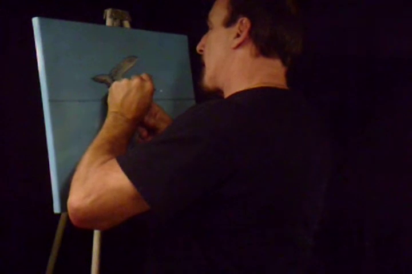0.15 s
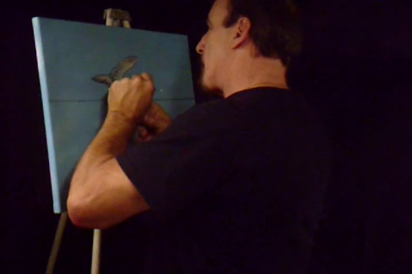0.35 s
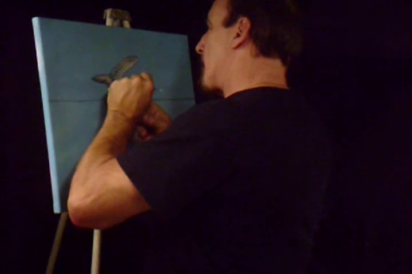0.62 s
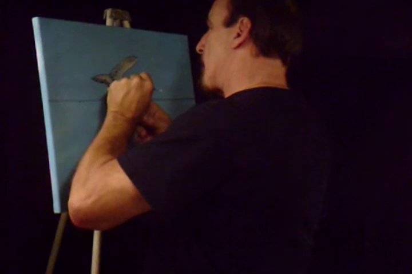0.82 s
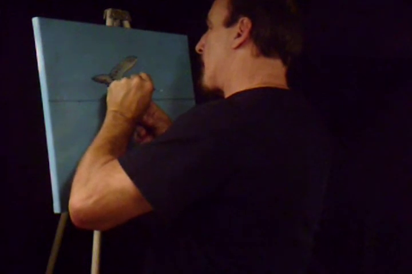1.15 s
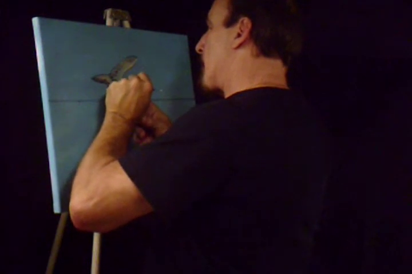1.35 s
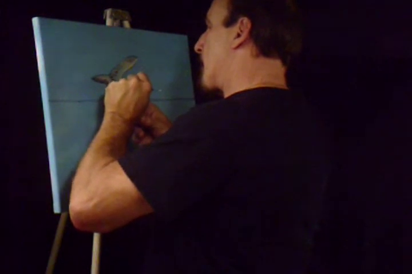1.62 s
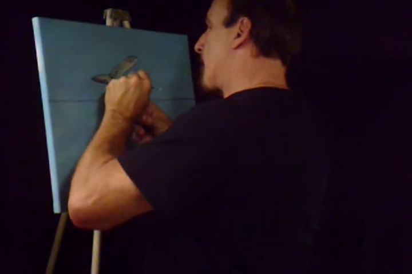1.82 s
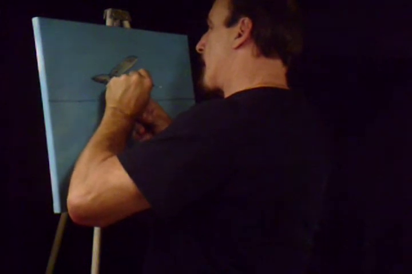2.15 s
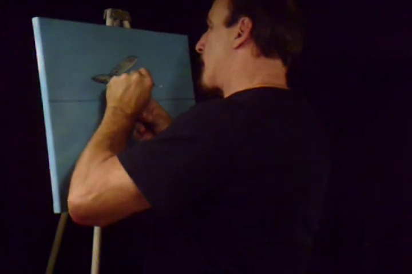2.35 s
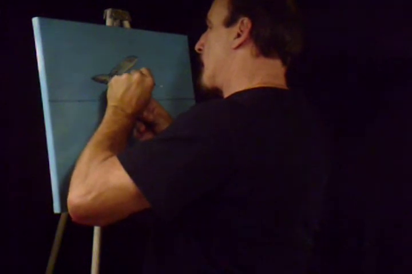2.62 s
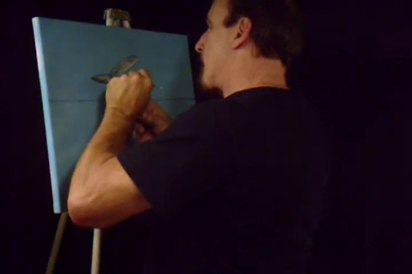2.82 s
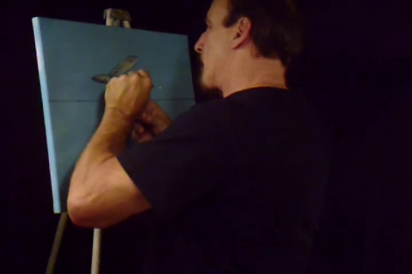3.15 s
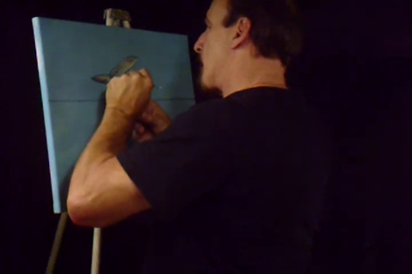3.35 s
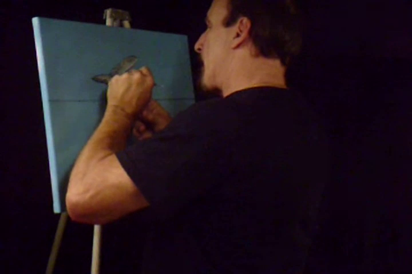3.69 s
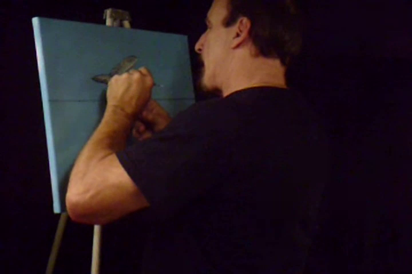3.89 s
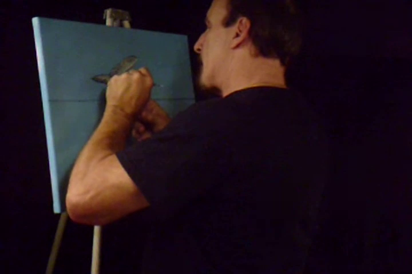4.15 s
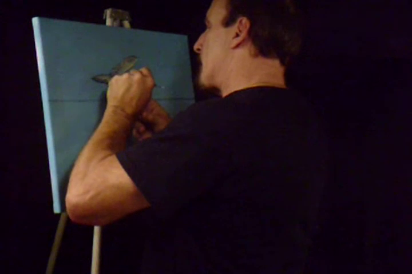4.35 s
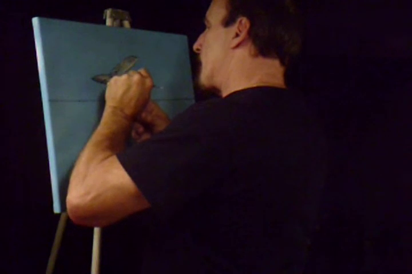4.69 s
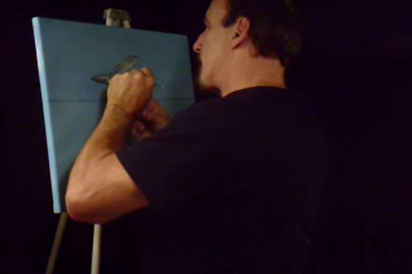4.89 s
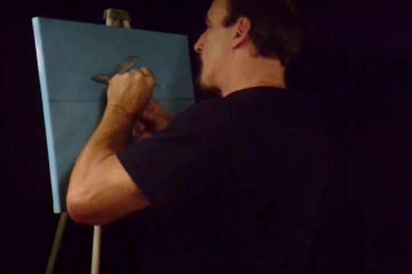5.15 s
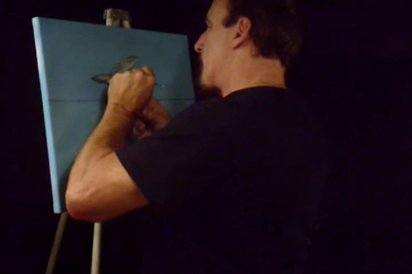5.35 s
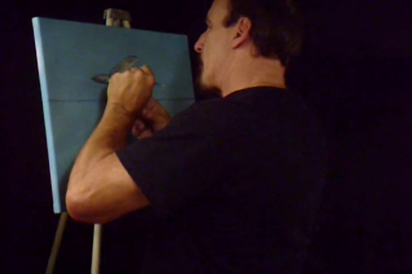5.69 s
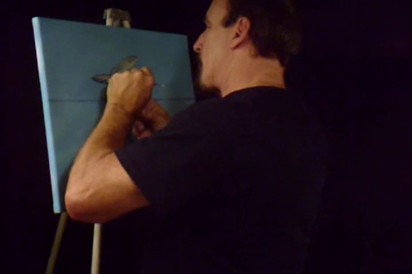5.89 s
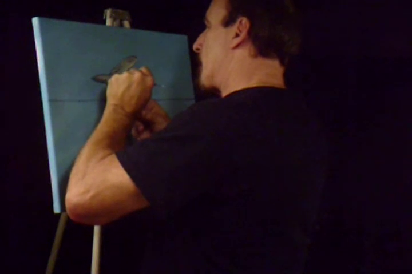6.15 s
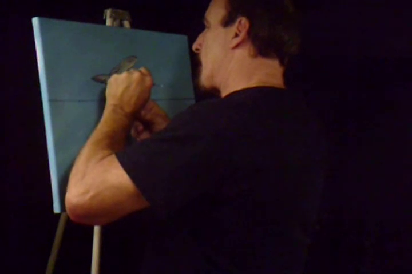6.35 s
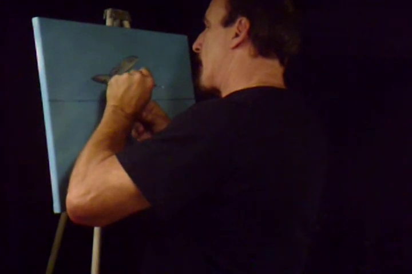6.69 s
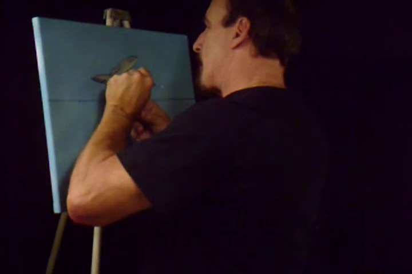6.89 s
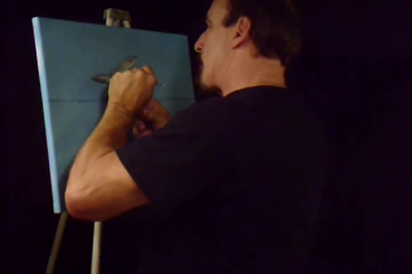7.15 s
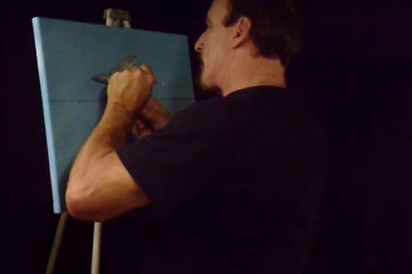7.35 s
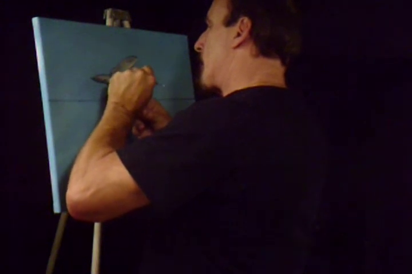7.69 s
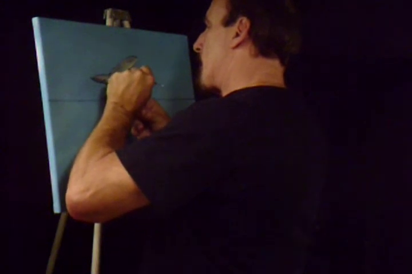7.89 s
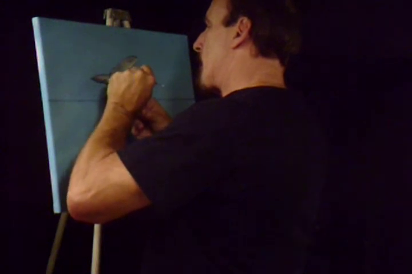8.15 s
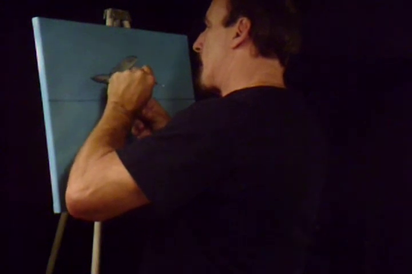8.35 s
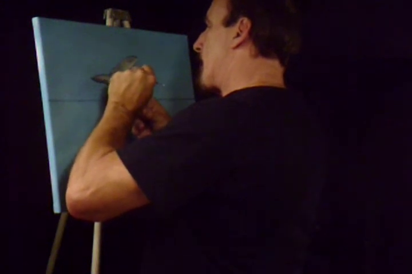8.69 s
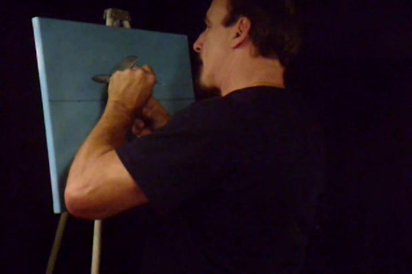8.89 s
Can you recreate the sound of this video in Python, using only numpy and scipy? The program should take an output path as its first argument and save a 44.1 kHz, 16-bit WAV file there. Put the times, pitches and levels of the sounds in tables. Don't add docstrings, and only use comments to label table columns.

```python
import sys
import numpy as np
from scipy import signal
from scipy.fft import rfft, irfft
from scipy.io import wavfile
from scipy.ndimage import uniform_filter1d

SR = 44100
rng = np.random.default_rng(int(sys.argv[2]) if len(sys.argv) > 2 else 0)


def gain_from_db(level_db):
    decades = np.asarray(level_db, float) / 20
    return 10 ** decades


def put_to_file(sound):
    columns = np.atleast_2d(sound).T
    safe = np.clip(columns, -1, 1)
    whole_steps = np.round(safe * 32767)
    wavfile.write(sys.argv[1], SR, whole_steps.astype(np.int16))


N = 397341
T = np.arange(N) / SR

# start_s, first_db, last_db, overshoot_db
GAIN_RAMPS = [(0.0, 1.3, 4.7, 0), (0.4036, -1.9, 4.0, -1.1), (1.3092, -1.9, 1.9, 0.5),
              (2.0174, -4.4, 0.5, -1.1), (2.5166, -2.0, 0.8, -0.9), (3.2248, -3.8, 2.1, -2.9),
              (3.933, -0.1, 1.6, -1.1), (4.3394, -1.6, 5.8, 0.8), (5.036, -1.4, 3.6, 0.7),
              (5.5468, -2.2, 2.6, -3.3), (6.2434, -2.4, 0.9, -3.4), (6.6498, -1.2, 4.9, -0.6),
              (7.3463, -7.4, 2.8, -1.7), (8.4609, -4.0, 1.6, -2)]
# freq_hz, density_db_per_hz
ROOM_SPECTRUM = [(3, -57.5), (18, -43.5), (35, -59), (60, -57), (110, -68.5), (160, -71), (300, -75),
                 (500, -79), (850, -77.5), (1150, -86.5), (1900, -89.5), (2400, -92.5), (5000, -94),
                 (11000, -99)]
# freq_hz, level_db
MOTOR_TONES = [(44.1, -42), (88.2, -48), (132.2, -58), (178.7, -62), (264.1, -64), (287, -64), (300.1, -58),
               (327.7, -69), (368.8, -67), (819.6, -68), (860.7, -69), (983.5, -75), (1080, -76),
               (1147.3, -77), (1450.5, -76), (1475, -69), (1638.9, -72), (1803.1, -77), (1966.9, -79)]
# freq_hz, density_db_per_hz
HISS_SPECTRUM = [(300, -105), (1200, -92.5), (2500, -92.5), (4000, -95.5), (7000, -91.5), (9500, -89.5),
                 (12000, -94.5)]
# freq_hz, level_db
CLOCK_TONES = [(2900.6, -76), (4200, -74), (4341, -79), (4800, -79), (5600, -81), (7400, -77), (7758, -79),
               (8400, -80), (9600.1, -67), (10800, -75), (11250.1, -75)]
# freq_hz, gain_db
CONVERTER_EDGE = [(9300, -0.5), (10300, -1.5), (11000, -9.5), (11800, -17), (12400, -31), (13000, -70)]
# start_s, push_db, rebound_share, hold_ms
FIRST_THUMPS = [(0.1668, -6.5, .21, 15), (0.8699, -4.3, .25, 23), (1.576, -3.9, .21, 17),
                (2.479, -4.8, .28, 21), (3.186, -3.9, .28, 23), (3.8967, -5.4, .14, 41),
                (4.7968, -4.9, .2, 17), (5.507, -5.0, .28, 23), (6.2065, -5.1, .3, 25),
                (7.1178, -5.9, .2, 19), (7.8164, -4.7, .18, 18), (8.7288, -5.7, .27, 13)]
# start_s, push_db, rebound_share, hold_ms
NEXT_THUMPS = [(0.3665, -6.5, .44, 4), (0.5686, -4.8, .2, 22), (1.0785, -4.3, .31, 14),
               (1.2724, -5.6, .21, 22), (1.776, -6.7, .28, 21), (1.9781, -4.3, .22, 16),
               (2.1779, -4.3, .3, 10), (2.689, -6.5, .28, 22), (2.885, -4.2, .29, 6),
               (3.3856, -5.4, .42, 10), (3.5883, -5.6, .3, 9), (4.0924, -6.1, .35, 25),
               (4.2973, -6.0, .24, 24), (4.4936, -6.2, .31, 11), (4.9986, -6.9, .35, 7),
               (5.1995, -5.1, .27, 19), (5.7021, -4.8, .31, 9), (5.9097, -4.7, .21, 24),
               (6.4078, -5.3, .29, 13), (6.6089, -4.7, .2, 29), (6.8102, -6.3, .4, 3),
               (7.3111, -4.0, .38, 4), (7.5205, -5.7, .22, 21), (8.0183, -4.9, .25, 9),
               (8.2183, -6.7, .4, 5), (8.4197, -5.0, .27, 15), (8.925, -7.3, .31, 9)]
# freq_hz, density_db_per_hz
RASP_SPECTRUM = [(150, -78), (350, -74.5), (600, -70), (1200, -82), (3000, -89), (5000, -94),
                 (8000, -89), (11000, -94.5)]
# centre_s, level_db, centre_hz,
# half_length_ms
LISTED_RUSTLES = [(0.624, -56, 5700, 3.5), (1.425, -58, 6100, 4.3), (1.444, -58, 7500, 3),
                  (2.035, -57, 9600, 3.3), (2.226, -56, 3700, 2.4), (2.244, -57, 5570, 2.3),
                  (2.387, -60, 9000, 3.2), (2.398, -57, 9200, 3.2), (2.427, -57, 8600, 2.2),
                  (2.782, -57, 8950, 3.2), (3.237, -57, 8850, 6.8), (3.446, -59, 2500, 6),
                  (3.643, -58, 4800, 3), (3.804, -57, 8800, 3.2), (4.403, -58, 9500, 3.8),
                  (4.449, -56, 5400, 2.2), (5.066, -55, 6600, 2), (5.56, -58, 8000, 6),
                  (5.615, -58, 7000, 6), (5.756, -56, 7600, 2.3), (5.808, -59, 8600, 4.9),
                  (5.96, -59, 4500, 6), (6.265, -55, 5000, 5.9), (6.465, -59, 7900, 4.4),
                  (6.779, -56, 8700, 2.5), (7.374, -57, 8800, 2.1), (7.571, -58, 7800, 11.8),
                  (7.674, -60, 7200, 4.9), (7.88, -59, 6450, 2.9), (8.78, -60, 7900, 7),
                  (1.291, -60, 2400, 5), (2.047, -57, 7000, 3), (2.09, -59, 8800, 3), (2.2, -59, 5000, 3),
                   (2.247, -58, 2600, 2.5), (2.545, -58, 6500, 5), (2.74, -59, 4500, 8),
                   (2.84, -59, 8500, 5), (3.635, -57, 3900, 2), (4.15, -59, 4000, 8), (4.195, -59, 5200, 3),
                   (4.36, -59, 4800, 3), (4.56, -59, 6500, 3), (4.801, -57, 2600, 2), (5.655, -59, 8000, 4),
                   (5.755, -59, 4450, 4), (6.664, -56, 6500, 2.7), (8.672, -59, 8200, 4.8),
                   (8.731, -60, 3050, 2.3)]

GAIN_BLOCK_SAMPLES, GAIN_BLOCK_OFFSET_SAMPLES, GAIN_SETTLE_S = 512, 391, .04
FRAME_HZ, READ_FROM_CYCLE, READ_TO_CYCLE = 19.866, .16, .755
PUSH_S, REBOUND_FADE_MS, WHINE_DB = .01005, 18, -46.9
THUMP_RUSTLE_LATE_S, THUMP_RUSTLE_DB, THUMP_RUSTLE_MS = .006, -60.5, 4.6


def read(points, hz):
    f, value = np.transpose(points)
    return np.interp(np.log(hz + 1), np.log(f + 1), value)


def lag(x, ms):
    r = np.exp(-1000 / (SR * ms))
    return signal.lfilter([1 - r], [1, -r], x)


def coloured(points):
    hz = np.fft.rfftfreq(N, 1 / SR)
    spectrum = rfft(rng.standard_normal(N)) * gain_from_db(read(points, hz))
    return irfft(spectrum * np.sqrt(SR / 2), N)


def tones(table, waver_db):
    out = np.zeros(N)
    knots_s = np.linspace(0, T[-1], 40)
    for hz, db in table:
        level = np.interp(T, knots_s, gain_from_db(db + waver_db * rng.standard_normal(40)))
        out += np.sqrt(2) * level * np.sin(2 * np.pi * (hz * T + rng.random()))
    return out


def lumps(depth_db, per_s):
    knots_s = np.arange(0, N / SR + 1, 1 / per_s)
    return gain_from_db(depth_db * np.interp(T, knots_s, rng.standard_normal(len(knots_s))))


def puffs(rows):
    out = np.zeros(N + 1400)
    t = np.arange(-700, 700) / SR
    for s, db, hz, width_hz, ms, glide in rows:
        smear_hz = max(width_hz - abs(glide) * ms, 300)
        noise = rng.standard_normal(1400) + 1j * rng.standard_normal(1400)
        noise = lag(noise, 1000 / (np.pi * smear_hz))
        carrier = np.exp(2j * np.pi * (hz * t + 500 * glide * t ** 2))
        puff = (noise * carrier).real * np.exp(-(1000 * t / ms) ** 2)
        level = gain_from_db(db - read(CONVERTER_EDGE, hz))
        puff *= level * np.sqrt(1.05 * ms * SR / 1000 / np.sum(puff ** 2))
        out[round(s * SR):][:1400] += puff
    return out[700:N + 700]


def gain_db():
    start_s, first_db, last_db, over_db = np.transpose(GAIN_RAMPS)
    block = (np.arange(N) - GAIN_BLOCK_OFFSET_SAMPLES) // GAIN_BLOCK_SAMPLES
    held_s = ((block + .5) * GAIN_BLOCK_SAMPLES + GAIN_BLOCK_OFFSET_SAMPLES) / SR
    k = np.maximum(np.searchsorted(start_s, held_s) - 1, 0)
    since_s = held_s - start_s[k]
    length_s = np.diff(np.append(start_s, N / SR))
    ramp_db = first_db[k] + (last_db - first_db)[k] * since_s / length_s[k]
    return ramp_db + over_db[k] * np.exp(-since_s / GAIN_SETTLE_S)


def room(busy):
    air = coloured(ROOM_SPECTRUM)
    low = lag(air, .42)
    air = air - low + low * lumps(2.6, 12)
    return air - .6 * busy * lag(air, 3)


def motors():
    return gain_from_db(.43) * tones(MOTOR_TONES, 1.86)


def readout():
    phase = T * FRAME_HZ % 1
    return lag(1. * (phase > READ_FROM_CYCLE) * (phase < READ_TO_CYCLE), .43)


def supply_step(gate):
    return gain_from_db(-39) * (gate - lag(gate, 19))


def circuit(gate):
    hiss = coloured(HISS_SPECTRUM) * gain_from_db(-4 * (2 - gate))
    clocks = gain_from_db(1.0) * gate * tones(CLOCK_TONES, 1.5)
    return (hiss + clocks) / gain_from_db(gain_db()) ** .56


def streaks(gate):
    u = rng.random((520, 5))
    rows = np.c_[u[:, 0] * T[-1],
                 -65 + 7 * u[:, 1],
                 2200 + 8300 * u[:, 2] ** .75,
                 300 + 500 * u[:, 4],
                 1.2 + 2.5 * u[:, 4],
                 1500 * (u[:, 3] - .65)]
    return gate * puffs(rows) / gain_from_db(gain_db())


def thumps():
    drive, whine, fizz, busy = np.zeros((4, N + 9000))
    t = np.arange(9000) / SR
    for s, db, rebound, hold_ms in FIRST_THUMPS + NEXT_THUMPS:
        at = slice(round(s * SR), round(s * SR) + len(t))
        fading_s = np.maximum(t - PUSH_S - hold_ms / 1000, 0)
        after = rebound * np.exp(-fading_s * 1000 / REBOUND_FADE_MS)
        pull = .5 * (t / PUSH_S) ** 3 - 1
        drive[at] += gain_from_db(db) * np.where(t < PUSH_S, pull, after)
        hz = 6260 - 900 * np.exp(-t / .0042) + rng.normal(0, 40)
        swell_s = np.where(t < PUSH_S - .0015, .0042, .0028)
        swell = np.exp(-((t - PUSH_S + .00063) / swell_s) ** 2)
        swell *= 1 + 2.6 * lag(rng.standard_normal(len(t)), .2)
        whine[at] += gain_from_db(WHINE_DB) * swell * np.sin(2 * np.pi * np.cumsum(hz) / SR)
        fizz[at] += .8 * np.exp(-((t - .55 * PUSH_S) / .008) ** 2)
        busy[at] += t < .045
    body = 1.04 * lag(lag(drive, 7), .3)
    rasp = fizz[:N] * coloured(RASP_SPECTRUM)
    return (body + whine)[:N] + rasp, uniform_filter1d(busy[:N], 600)


def rustles():
    s, db, hz, ms = np.transpose(LISTED_RUSTLES)
    listed = np.c_[s, db, hz, 500 + 180 * ms, ms, rng.normal(-20, 110, len(s))]
    s = np.transpose(FIRST_THUMPS + NEXT_THUMPS)[0] + THUMP_RUSTLE_LATE_S
    u = rng.random((len(s), 3))
    wide = u[:, 0] < .2
    stirred = np.c_[s,
                    THUMP_RUSTLE_DB - 6 * u[:, 1] ** 2,
                    9500 - 2300 * wide,
                    1100 + 1800 * wide,
                    THUMP_RUSTLE_MS * (.6 + .8 * u[:, 2]),
                    -60 - 120 * wide]
    u = rng.random((70, 4))
    high = np.c_[u[:, 0] * T[-1],
                 -59 - 14 * u[:, 1],
                 10100 + 1750 * u[:, 1],
                 900 - 300 * u[:, 1],
                 1.7 + 1.8 * u[:, 2],
                 150 * (u[:, 3] - .45)]
    return gain_from_db(6.5) * puffs(np.vstack([listed, stirred, high])) / gain_from_db(gain_db())


def scene():
    gate = readout()
    blows, busy = thumps()
    electronics = supply_step(gate) + circuit(gate) + streaks(gate)
    dc_offset = .0045
    return (blows + rustles() + room(busy) + motors() + electronics + dc_offset)[None]


def top_cut(x):
    return signal.sosfilt(signal.butter(12, 12330, fs=SR, output="sos"), x)


def record(dry):
    hz = np.linspace(0, SR / 2, 1025)
    taps = signal.firwin2(401, hz, gain_from_db(read(CONVERTER_EDGE, hz)), fs=SR)
    mix = signal.oaconvolve(dry * gain_from_db(gain_db()), taps[None], "same")
    return top_cut(mix)


dry = scene()
out = record(dry)
put_to_file(out)
```